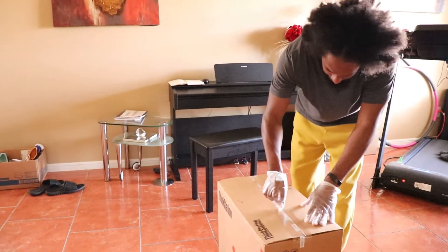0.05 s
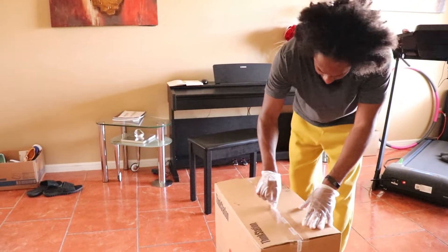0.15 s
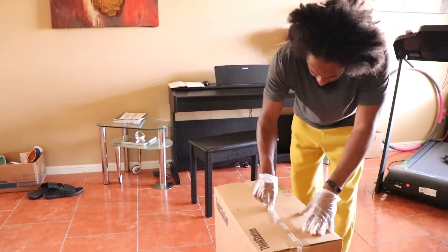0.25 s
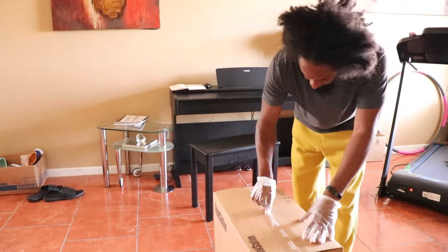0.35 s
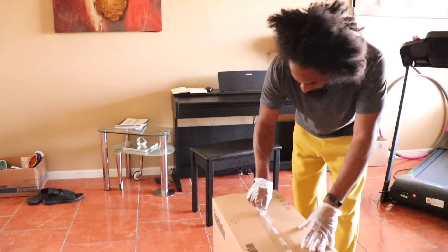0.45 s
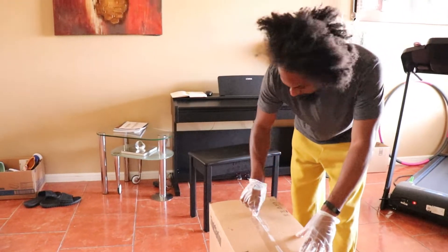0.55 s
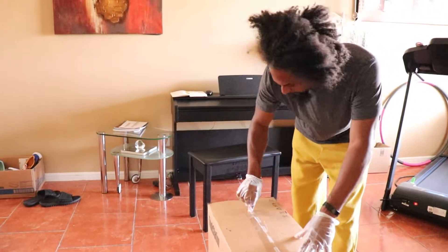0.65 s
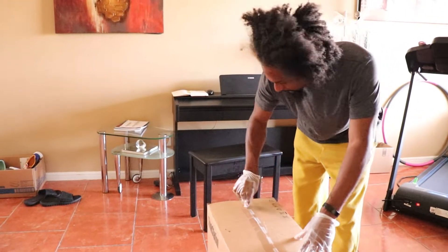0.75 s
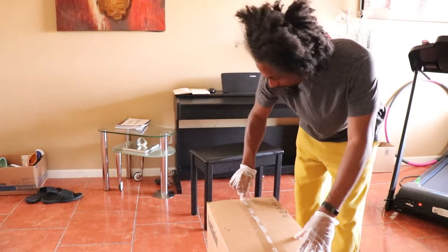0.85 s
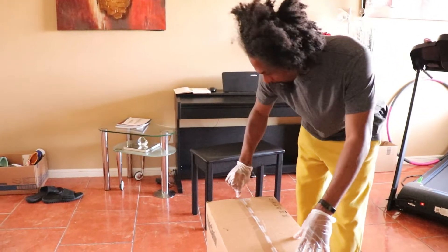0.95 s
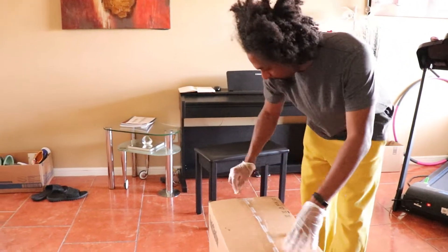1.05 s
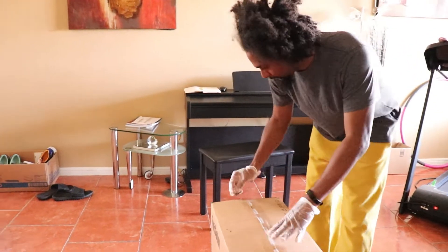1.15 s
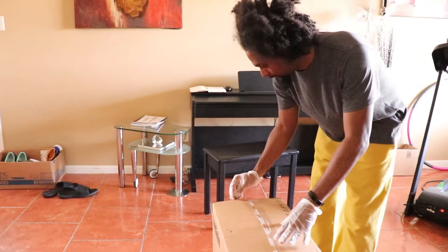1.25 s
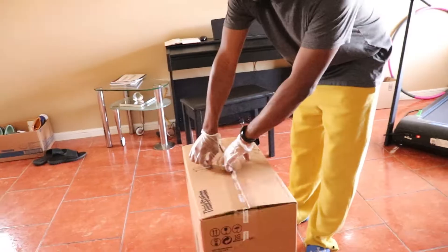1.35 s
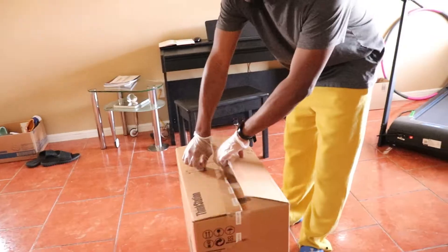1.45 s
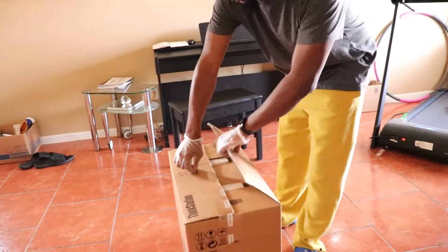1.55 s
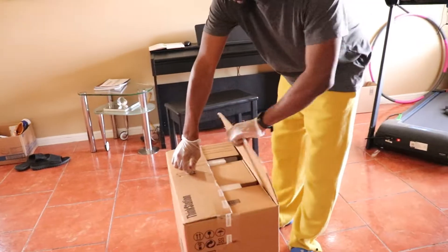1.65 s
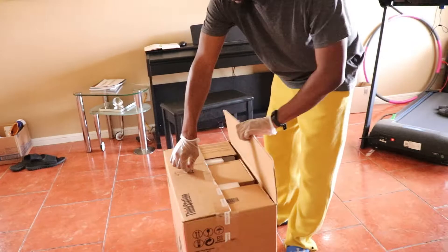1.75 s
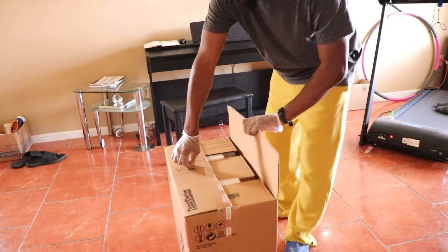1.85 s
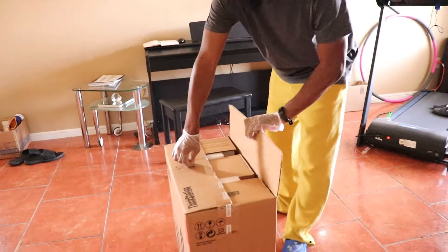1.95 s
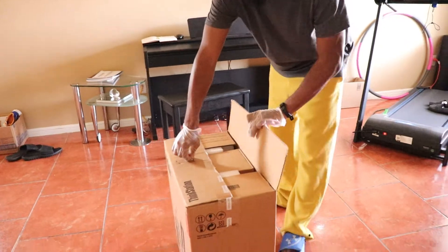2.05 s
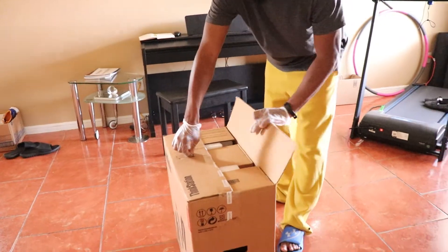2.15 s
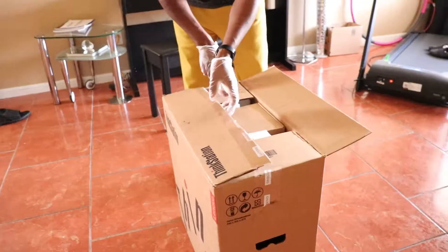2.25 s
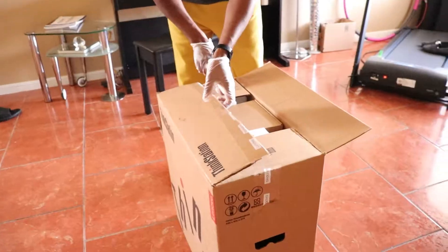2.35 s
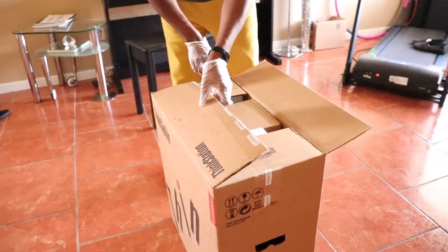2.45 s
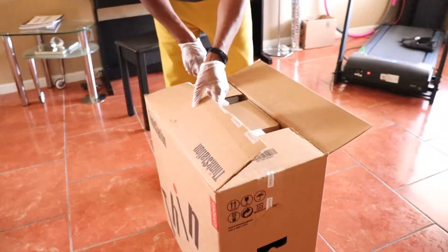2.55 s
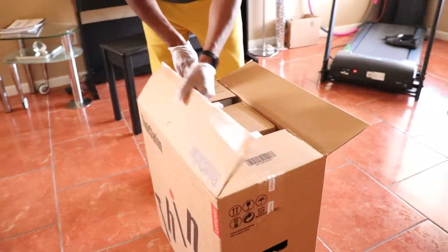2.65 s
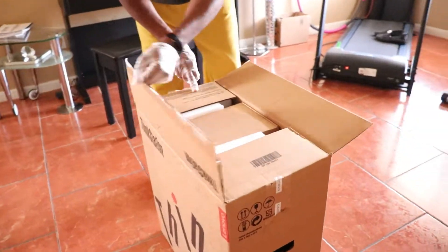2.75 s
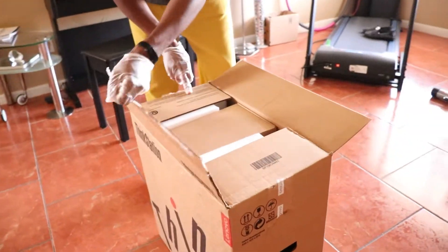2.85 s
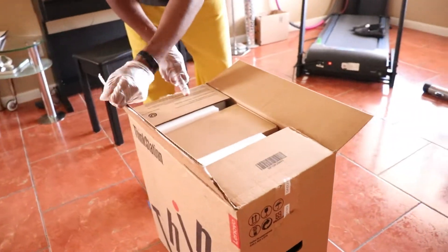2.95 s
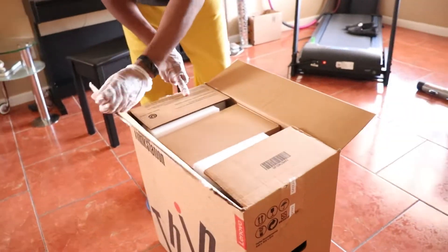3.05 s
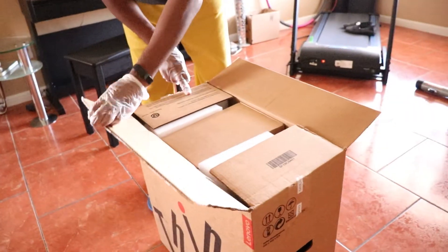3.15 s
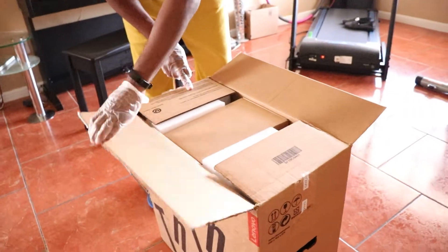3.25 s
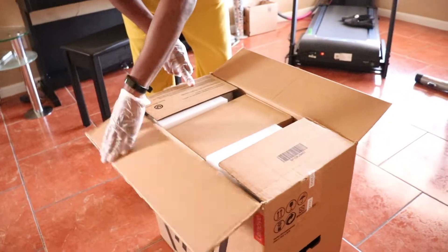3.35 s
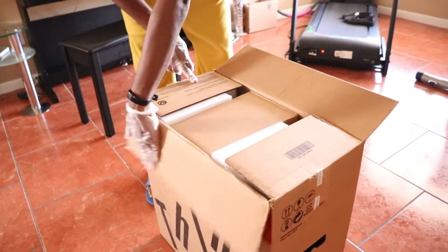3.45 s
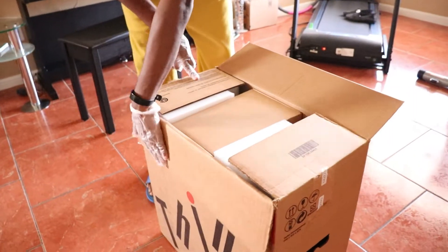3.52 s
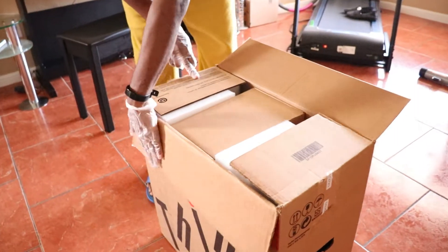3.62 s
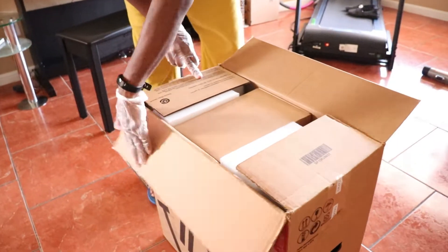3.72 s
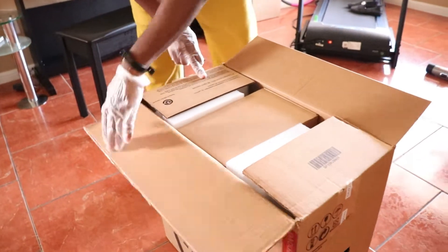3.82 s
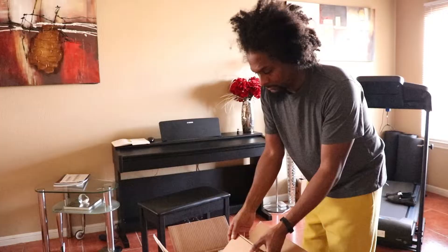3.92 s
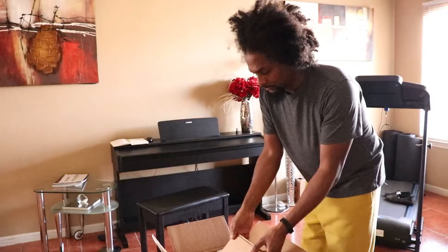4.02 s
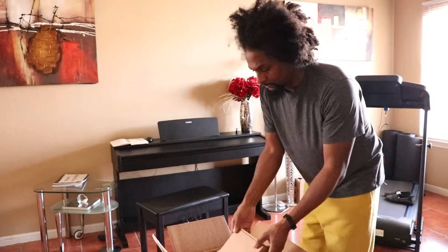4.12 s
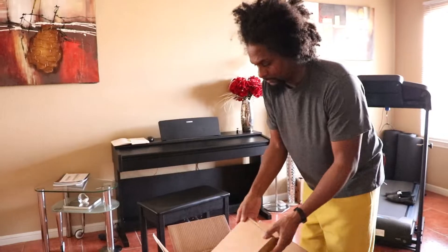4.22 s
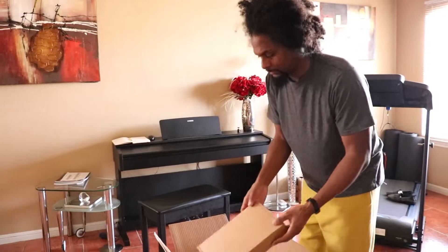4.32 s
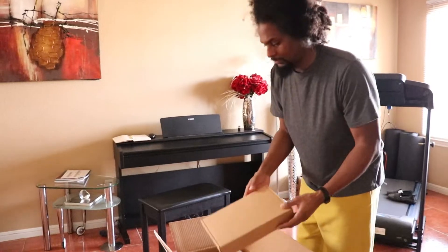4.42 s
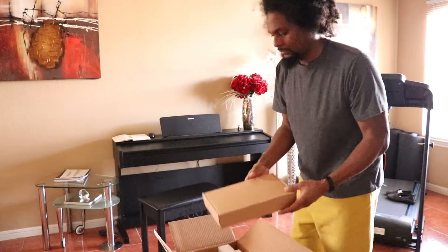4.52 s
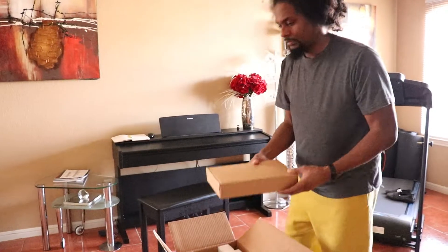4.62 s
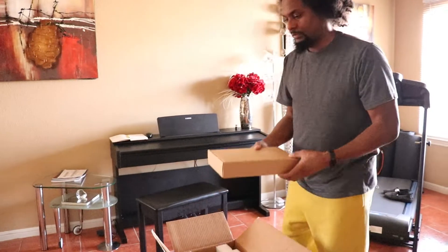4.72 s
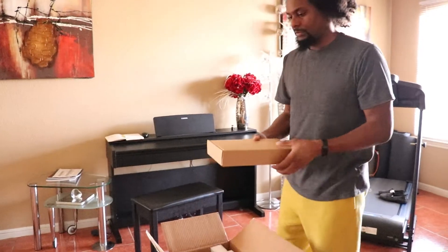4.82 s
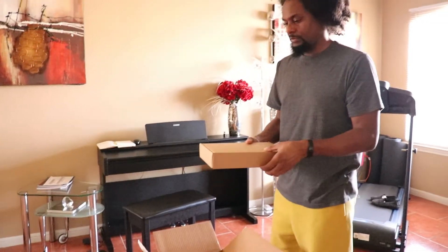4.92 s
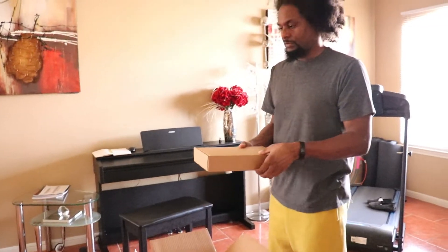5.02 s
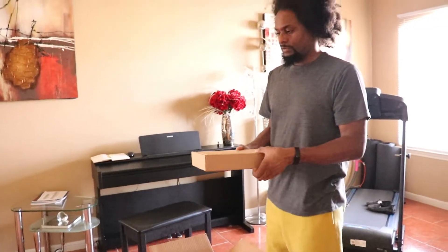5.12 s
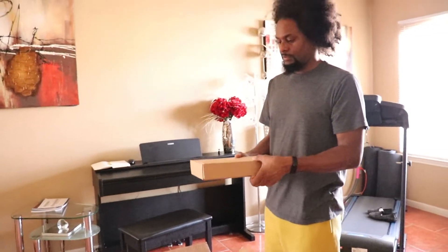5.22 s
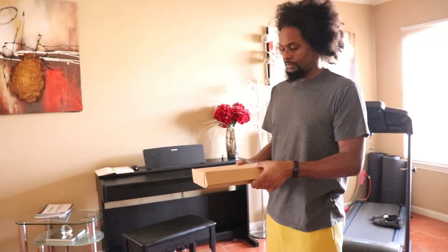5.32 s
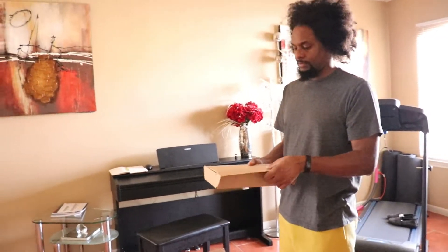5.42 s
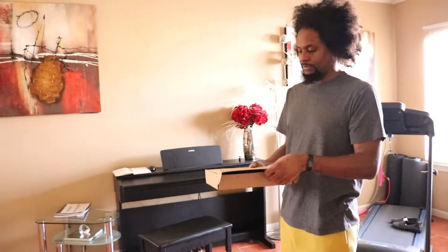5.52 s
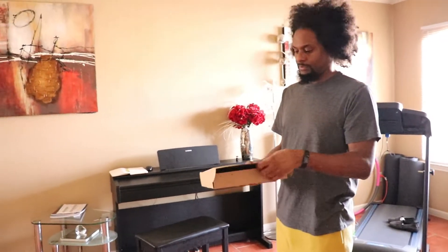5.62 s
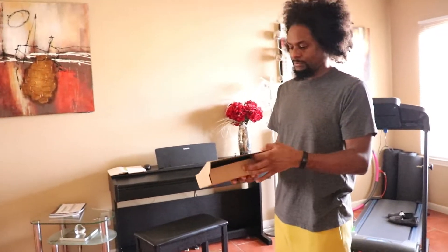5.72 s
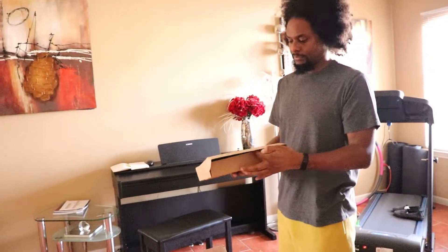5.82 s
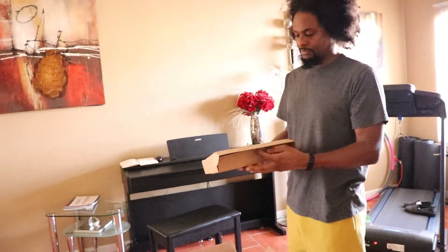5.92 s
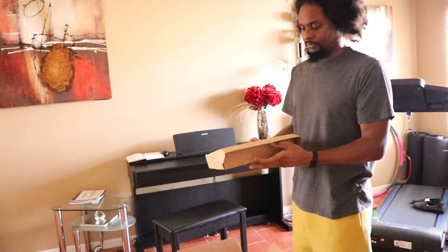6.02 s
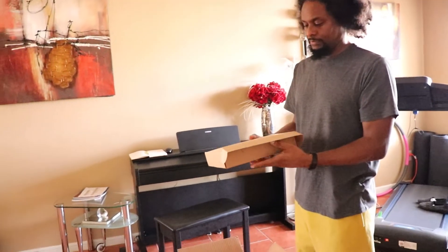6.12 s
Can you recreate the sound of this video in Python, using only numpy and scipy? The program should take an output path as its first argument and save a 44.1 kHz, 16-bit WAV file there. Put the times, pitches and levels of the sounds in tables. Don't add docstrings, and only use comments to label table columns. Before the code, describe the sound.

Over faint steady room hiss, a large cardboard box is handled in a bright, hard room. From 0 to 1.3 s there is soft board rubbing, a small tape crack with a hollow knock at 0.2, another crack near 0.55, and light snaps and ticks to 1.2. At about 1.5 s tape lets go loudly, with creases popping and two or three hollow thumps, then a ringing decay cut off at 2.3. A sharp crack and knock come at 2.36, a crease pop at 2.6, the strongest boxy thump at 2.7, and more thuds with a brief tape twang at 2.8. Dry ticks and scraping lead to a deep thump at 3.55 and a crack at 3.7. From 3.96 it turns very quiet: faint sliding, a barely audible tap at 4.67, soft rubbing and small snaps around 5.2 to 5.5, and weak pops at 5.7 and 6.07.

```python
import sys
import numpy as np
from scipy import signal
from scipy.fft import rfft, irfft
from scipy.io import wavfile
from scipy.ndimage import uniform_filter1d

SR = 44100
rng = np.random.default_rng(int(sys.argv[2]) if len(sys.argv) > 2 else 0)


def wav_out(sig):
    wavfile.write(sys.argv[1], SR, np.round(np.clip(np.atleast_2d(sig).T, -1, 1) * 32767).astype(np.int16))


def voltage_ratio(level):
    return 10 ** (np.asarray(level, float) / 20)


N = 272390

SCENE_CHANGES = [
    0,
    1.352,
    2.295,
    3.96,
    5.185,
    7,
]
# (frequency [Hz], density [dB per Hz])
BACKGROUND = [(15, 22), (45, 3), (137, 1.5), (800, -3.5), (1400, -9), (3340, -12), (7000, -17),
              (16000, -18.5)]
BACKGROUND_DB = -53
# (frequency [Hz], t60 [s])
ROOM_DECAY = [(60, 0.23), (120, 0.67), (260, 0.67), (700, 0.94), (1800, 0.81), (4800, 0.99), (12000, 0.52)]
# (delay [ms], level [dB])
WALL_ECHOES = [
    (4.1, -9.5),
    (7.3, -12.5),
    (11.5, -9.5),
    (16.2, -17),
    (21, -16.5),
]

# (frequency [Hz], width [Hz], level [dB])
BOARD_LAYERS = [
    [(150, 110, -5), (248.3, 110, -3.5), (410, 220, 2.5)],
    [(740, 380, 2), (1100, 480, 5), (1700, 800, -1.5)],
    [(2547, 1000, -1.5), (3300, 1000, 3.5), (4520, 2000, -6)],
    [(6500, 4200, 11), (12000, 9000, 4.5)],
]
# (time [s], time to fade 20 dB [s], rasp [dB], weight on the box [dB], hiss [dB])
JERKS = [(0.001, .3, -42, 6, -7), (0.222, .2, -44, 3, 4), (0.56, .4, -37, -2, -10), (1.359, .3, -40, 3, -4),
         (1.495, .1, -21, 9, -6), (1.534, .02, -11, 2.5, -4), (1.54, .22, -27, 11, -20),
         (2.368, .25, -38, 9, -3), (2.6, .14, -28, .8, -6), (2.705, .2, -36, 15, -2),
         (2.836, .02, -18, 11, -14), (2.85, .2, -29, 6, -13), (3.558, .17, -35, 17, -20),
         (4.105, .3, -48, 7, -10), (4.66, .2, -46, .5, -13), (5.19, .12, -43, 1.5, -12),
         (5.725, .35, -43, 3, -15), (6.075, .25, -45, 6, -24)]
# (peak time [s], time to swell 20 dB [s], rasp [dB], weight on the box [dB], hiss [dB])
SLIDES = [(0.88, .25, -34, 2.5, -13), (0.97, .12, -37, -3, -3), (1.39, .04, -41, -4, 7),
          (2.335, .03, -58, -5, 6), (2.8, .1, -33, 12, -15), (3.44, .1, -46, -2, 5),
          (3.505, .06, -32, .8, -5), (4.25, .16, -42, -1.5, -4), (4.56, .06, -56, 8, -14),
          (4.94, .1, -53, 8, -12), (5.06, .06, -55, 6, -10), (5.15, .03, -55, 8, -10),
          (5.33, .25, -36, -1.5, -16), (5.47, .25, -35, 2.5, -11), (5.66, .1, -45, 3, -16),
          (5.76, .07, -38, -4, -11), (0.69, .12, -38, 3, -14), (0.53, .12, -47, 3, -8),
          (3.99, .3, -58, 9, -12), (2.24, .15, -58, 5, -8)]
JERK_RISE_S, EASE_SHARE = .006, .8
RUSTLE_DB, RUSTLE_SHARE, HISS_DB = .8 - .5, .2, .8
STEP = 64

# (time [s], level [dB], centre [Hz])
TICKS = [(0.4313, -35, 9000), (0.8409, -31, 6000), (0.8596, -33, 6000), (1.0624, -37, 5000),
         (1.3834, -35, 8000), (1.438, -28, 6520), (1.4544, -40, 8000), (2.3375, -33, 3190),
         (2.6385, -35, 7000), (3.112, -31, 6000), (3.1565, -30, 5500), (3.3353, -35.5, 5160),
         (3.3616, -40, 8000), (3.4184, -30, 6120), (3.4361, -19.5, 7000), (3.493, -20, 5990),
         (3.6596, -22, 5500), (3.945, -47, 9000), (4.395, -46, 9000), (5.2624, -33, 7000)]
TICK_ROOM_DB, TICK_AIR_DB, TICK_MS = -6, -2, 2.6
# (time [s], level [dB], centre [Hz], room share [dB])
CREASES = [(0.303, -26, 1470, -9), (0.594, -28, 1600, -4.5), (0.9568, -23, 1310, -8.5),
           (1.4917, -10, 1800, -12), (1.5054, -16, 1260, -9), (1.5321, -6, 1135, -3.5),
           (2.603, -13, 1240, -19), (2.365, -15, 1000, -5), (2.6952, -7, 1000, -2.5),
           (2.8365, -12, 1110, -4), (3.3983, -30, 2010, 1), (3.465, -29.5, 1510, -7),
           (3.5107, -26, 960, -8), (3.5549, -11, 800, -4), (4.9412, -45, 1180, -4.5),
           (5.7203, -28, 1310, -3), (6.066, -27, 1700, -5)]
CREASE_AIR_DB, CREASE_MS = -22, 3.1
# (time [s], level [dB], centre [Hz], room share [dB])
TAPE = [(0.1818, -37, 2800, -3), (0.2183, -16, 2840, -3.5), (0.5584, -17, 2840, -7),
        (0.7714, -21.5, 3040, -3), (0.9575, -22, 3300, -6), (1.1079, -21.5, 3240, -2),
        (1.1772, -29, 2600, -13), (1.3584, -36, 3080, 4), (1.3865, -29, 3140, -7), (1.486, -3.5, 3080, -4),
        (2.3627, -6, 2600, -12), (2.733, -22, 3500, -5), (2.8362, -16, 4600, -1.5),
        (2.9503, -15, 3800, -5.5), (3.5016, -21, 3260, -4.5), (3.7031, -12.5, 3700, -8),
        (5.1906, -34, 3460, 0.5), (5.231, -45, 3760, -15), (5.3313, -33, 2560, 3), (5.462, -29, 3240, -5.5)]
TAPE_AIR_DB, TAPE_MS = -20, 2.5
# (frequency [Hz], level [dB], t60 [s])
TAPE_MODES = [
    (2600, -37, .03),
    (4050, -31, .05),
    (5300, -32, .025),
    (6500, -37, .025),
    (7900, -36, .025),
]
TWANG_S = 2.8365

# (frequency [Hz], level [dB], t60 [s])
BOX_MODES = [(61.6, -21, .15), (118.3, 1.5, 0.27), (163.3, 1, .2), (236.7, -4, 0.14), (328.7, 0, 0.12),
             (363.7, 1, 0.12), (408, -3.5, 0.086), (474.5, -5.5, 0.086), (565, -3, 0.047),
             (710, -10, 0.064), (890, -30, .05), (1150, -27, 0.058), (1310, -28, .05)]
DEEP_HZ = 200
# (time [s], level [dB], deep modes [dB], pitch factor [-], room share [dB])
KNOCKS = [(0.217, -16, -8.5, 0.99, -4), (0.306, -32.5, -24, 0.93, -6), (0.557, -36.5, -10, 0.86, -2),
          (1.356, -33.5, -23, 0.98, -1), (1.4875, -7, -9, 1.03, -7), (1.531, -7, -4.5, 1.01, -5),
          (1.573, -8.5, -24, 1.12, -8.5), (2.364, -9.5, -19, 1.09, -6), (2.603, -33, -26, 0.89, -12),
          (2.696, -1, -11, 1.22, -14), (2.729, -13, -2, 1.01, 0.5), (2.814, -8, -4, 0.89, -8),
          (2.836, -14, -6, 1.01, -4), (3.554, -5, 2.5, 0.99, -10), (4.669, -48, -7, 1.2, -11),
          (4.895, -54, -9, 1.1, -2), (5.716, -46, -28, 0.93, -2), (6.067, -38.5, -19, 0.95, -3)]
CONTACT_MS, HARDER_MS_PER_DB = 1.3, .008

RUMBLE_CUT_HZ, EDGE_HZ = 65, 16300


def evened(x):
    return x / np.sqrt(np.mean(x ** 2) + 1e-20)


def peaked(x):
    return x / np.max(abs(x))


def read(points, hz):
    f, value = np.transpose(points)
    return np.interp(np.log(hz + 1), np.log(f + 1), value)


def add(mix, s, sound):
    part = mix[:, round(s * SR):][:, :sound.shape[1]]
    part += sound[:, :part.shape[1]]


def resonate(x, hz, width):
    b, a = signal.iirpeak(min(hz, .45 * SR), hz / min(width, SR / 3), SR)
    return signal.lfilter(b, a, x)


def background():
    hz = np.fft.rfftfreq(N, 1 / SR)
    spectrum = rfft(rng.standard_normal(N)) * voltage_ratio(read(BACKGROUND, hz))
    return voltage_ratio(BACKGROUND_DB) * evened(irfft(spectrum, N))


def room_tail():
    length, spacing = SR + SR // 4, 16
    taps = np.zeros(length)
    slots = np.arange(0, length - 20, spacing)
    at = slots + rng.integers(0, spacing, len(slots))
    taps[at] = rng.choice([-1., 1.], len(at))
    taps *= np.clip((np.arange(length) / SR - .006) / 0.017, 0, 1)
    hz, t, z = signal.stft(taps, SR, nperseg=512)
    decay = voltage_ratio(-60 * t / read(ROOM_DECAY, hz)[:, None])
    tail = signal.istft(z * decay, SR, nperseg=512)[1]
    tail /= np.linalg.norm(tail)
    for ms, db in WALL_ECHOES:
        tail[round(ms * SR / 1000)] += voltage_ratio(db)
    return tail


def board(grit):
    layers, sign = [], 1
    for modes in BOARD_LAYERS:
        layer = 0
        for hz, width, db in modes:
            layer = layer + sign * voltage_ratio(db) * resonate(resonate(grit, hz, width), hz, 2 * width)
            sign = -sign
        layers.append(evened(layer))
    return layers


def pressure(s, rise_s, fall_s, curve):
    t = np.arange(0, N, STEP) / SR
    away = np.where(t < s, (s - t) / rise_s, (t - s) / fall_s)
    same_scene = np.searchsorted(SCENE_CHANGES, t, "right") == np.searchsorted(SCENE_CHANGES, s, "right")
    return voltage_ratio(-20 * away ** curve) * same_scene


def rubbing():
    click_db = 3.5 * np.minimum(rng.exponential(1, N), 3.9)
    clicking = rng.random(N) < 6000 / SR
    grit = rng.standard_normal(N) * voltage_ratio(click_db) * clicking
    wander = uniform_filter1d(uniform_filter1d(rng.standard_normal(N), 600), 600)
    flutter = voltage_ratio(2.85 * evened(wander))
    strokes = [(pressure(s, JERK_RISE_S, fade_s, 1.05), *levels) for s, fade_s, *levels in JERKS]
    strokes += [(pressure(s, swell_s, EASE_SHARE * swell_s, 1.5), *levels) for s, swell_s, *levels in SLIDES]
    power = 0
    for shape, rasp_db, weight_db, hiss_db in strokes:
        rustle_db = RUSTLE_DB + RUSTLE_SHARE * weight_db
        layer_db = rasp_db + np.array([weight_db, rustle_db, 0, HISS_DB + hiss_db])
        power = power + (voltage_ratio(layer_db)[:, None] * shape) ** 2
    rub = 0
    for layer_power, layer in zip(power, board(grit)):
        envelope = np.interp(np.arange(N), np.arange(0, N, STEP), np.sqrt(layer_power))
        rub = rub + envelope * layer
    return voltage_ratio(-9.6) * rub * flutter * np.array([[1], [voltage_ratio(-2.0)]])


def snap(db, hz, room_db, air_db, length_ms, noise):
    t = np.arange(len(noise)) / SR
    burst = noise * abs(noise) ** .8 * voltage_ratio(-22 * t / (length_ms / 1000))
    impulse = np.linalg.norm(burst) * (t == 0)
    high_pass = signal.butter(2, 7500, "high", fs=SR)

    def radiate(drive):
        panel = resonate(resonate(drive, hz, 0.66 * hz), hz, 2.87 * hz)
        return panel, signal.lfilter(*high_pass, drive)

    panel, air = radiate(burst)
    wide_panel, wide_air = radiate(impulse)
    panel_gain = 1 / np.max(abs(panel))
    air_gain = voltage_ratio(air_db) / np.max(abs(air))
    direct = panel_gain * panel + air_gain * air
    to_room = voltage_ratio(room_db) * (panel_gain * wide_panel + air_gain * wide_air)
    return voltage_ratio(db + 4.0) * np.array([direct, to_room])


def twang():
    t = np.arange(SR // 10) / SR
    ring = sum(voltage_ratio(db - 60 * t / t60) * np.sin(2 * np.pi * hz * t) for hz, db, t60 in TAPE_MODES)
    return ring * np.array([[1], [voltage_ratio(4.0)]])


def knock(db, deep_db, pitch, room_db, turns):
    t = np.arange(SR // 3) / SR
    ring = 0
    for (hz, level, t60), turn in zip(BOX_MODES, turns):
        decay = voltage_ratio(level + deep_db * (hz < DEEP_HZ) - 60 * t / t60)
        ring = ring + decay * np.sin(2 * np.pi * (hz * pitch * t + 0.29 * turn))
    contact_ms = CONTACT_MS - HARDER_MS_PER_DB * db
    push = np.hanning(max(round(contact_ms * SR / 1000), 3) + 2)
    return voltage_ratio(db + 1.5) * peaked(np.convolve(ring, push)) * np.array([[1], [voltage_ratio(room_db)]])


def scene():
    box = rubbing()
    snaps = [(*row, CREASE_AIR_DB, CREASE_MS) for row in CREASES]
    snaps += [(*row, TAPE_AIR_DB, TAPE_MS) for row in TAPE]
    snaps += [(*row, TICK_ROOM_DB, TICK_AIR_DB, TICK_MS) for row in TICKS]
    for s, *settings in snaps:
        add(box, s, snap(*settings, rng.standard_normal(1500)))
    add(box, TWANG_S, twang())
    for s, *settings in KNOCKS:
        add(box, s, knock(*settings, rng.uniform(-1.01, 1, len(BOX_MODES))))
    out = box[0] + background()
    t = np.arange(N) / SR
    for start, end in zip(SCENE_CHANGES, SCENE_CHANGES[1:]):
        now = (t >= start) & (t < end)
        out[now] += signal.fftconvolve(box[1][now], room_tail())[:now.sum()]
    return out[None]


def microphone_bass(x):
    return signal.sosfilt(signal.butter(3, RUMBLE_CUT_HZ, "high", fs=SR, output="sos"), x)


def top_cut(x):
    return signal.sosfilt(signal.butter(12, 17000, fs=SR, output="sos"), x)


def record(dry):
    soft = 0.92 * np.tanh(dry / .95)
    treble_edge = signal.firwin(255, EDGE_HZ, fs=SR)[None]
    limited = signal.oaconvolve(microphone_bass(soft), treble_edge, "same")
    return top_cut(limited)


dry = scene()
out = record(dry)
wav_out(out)
```